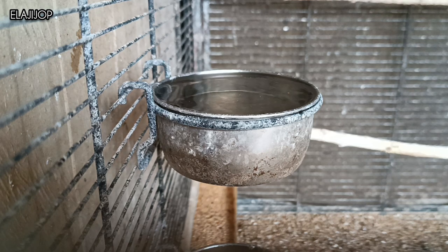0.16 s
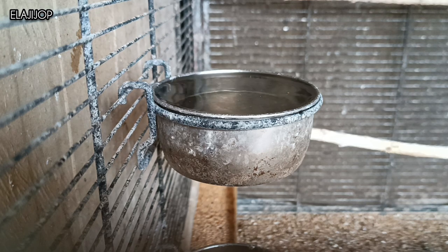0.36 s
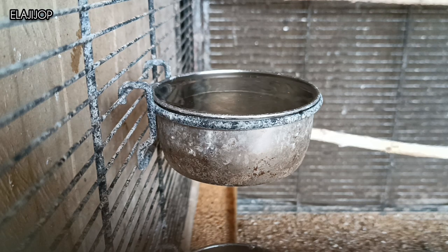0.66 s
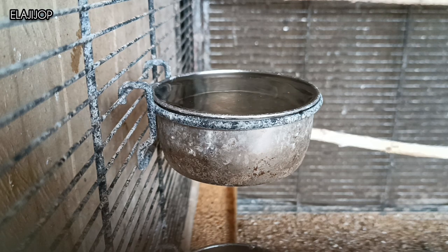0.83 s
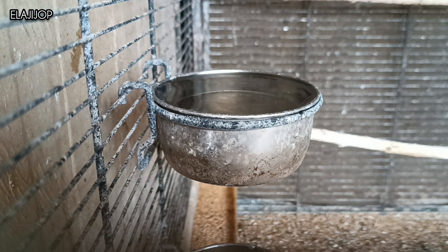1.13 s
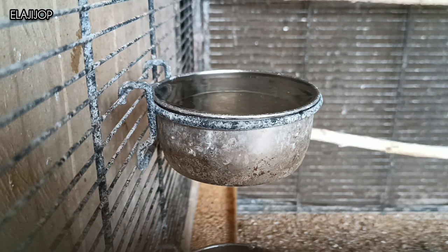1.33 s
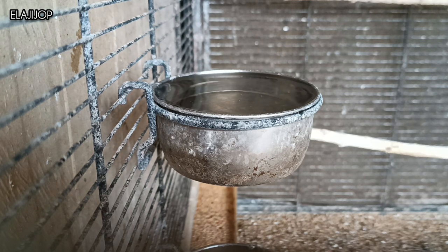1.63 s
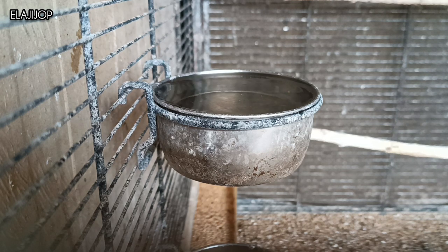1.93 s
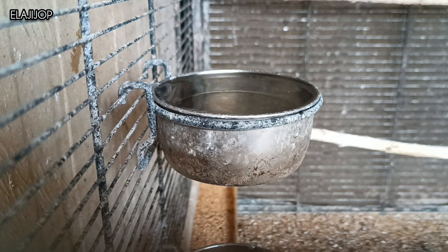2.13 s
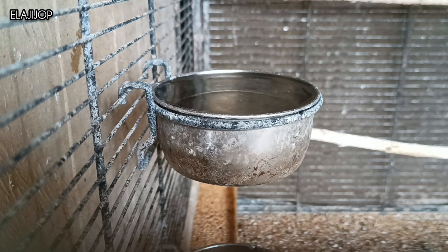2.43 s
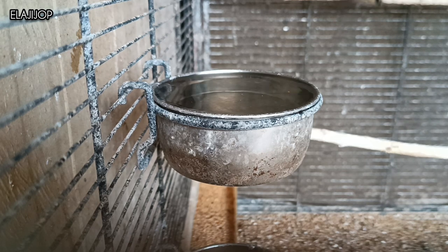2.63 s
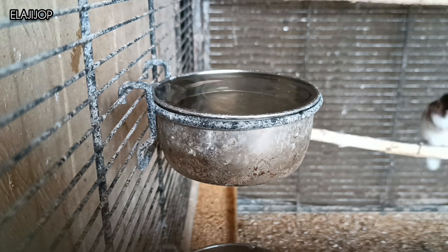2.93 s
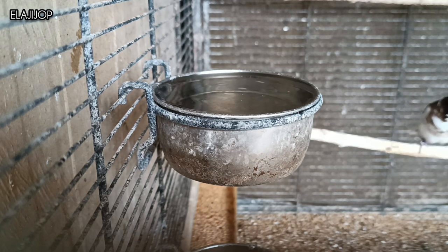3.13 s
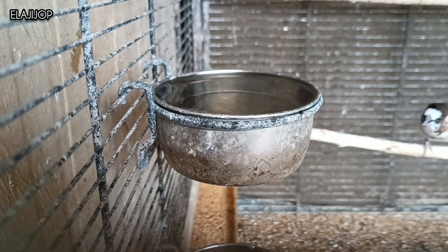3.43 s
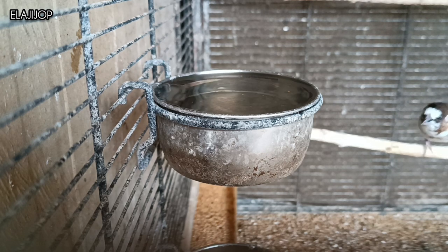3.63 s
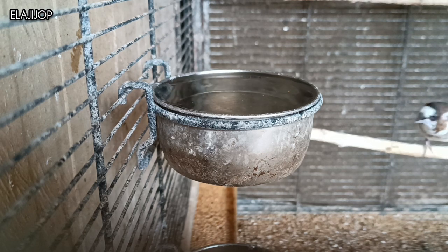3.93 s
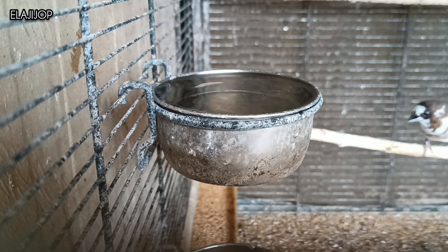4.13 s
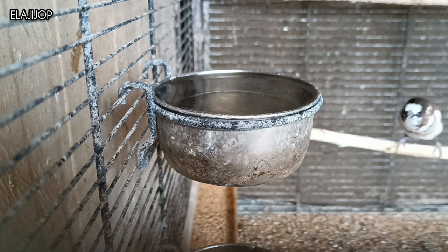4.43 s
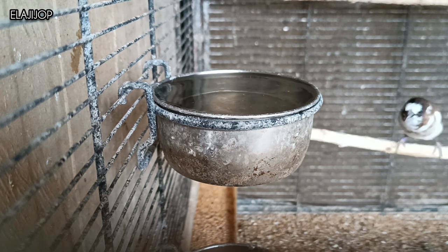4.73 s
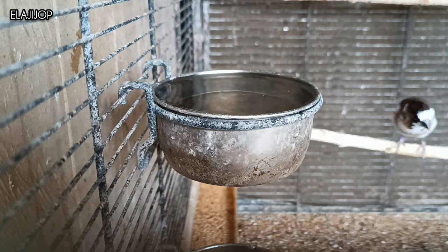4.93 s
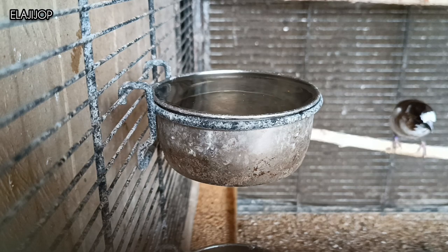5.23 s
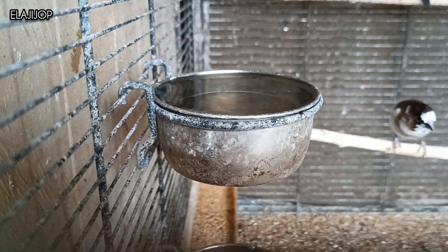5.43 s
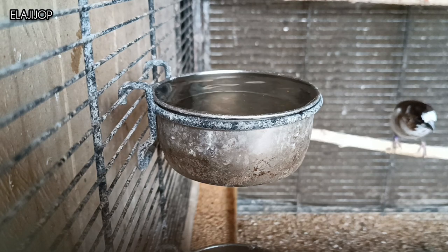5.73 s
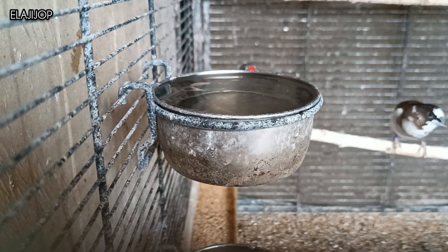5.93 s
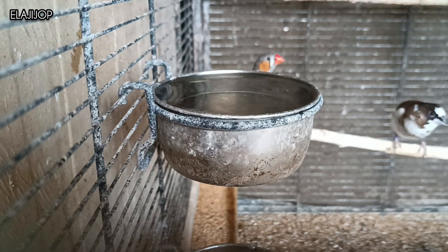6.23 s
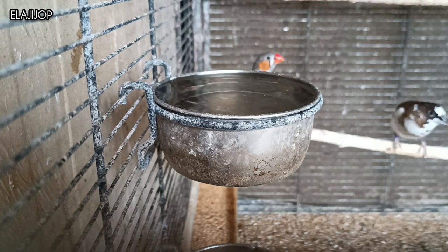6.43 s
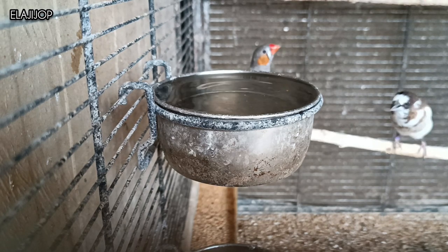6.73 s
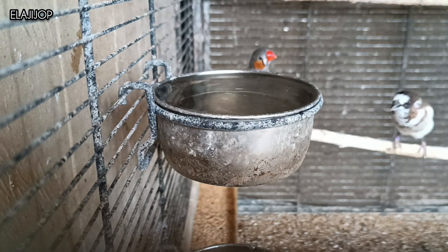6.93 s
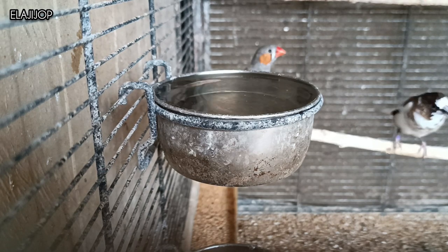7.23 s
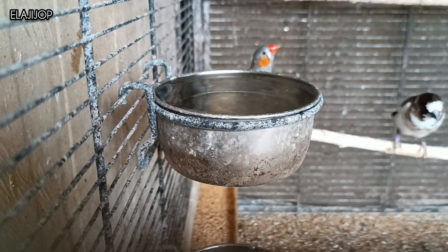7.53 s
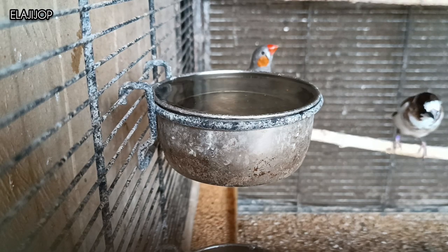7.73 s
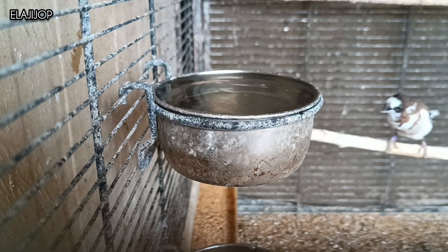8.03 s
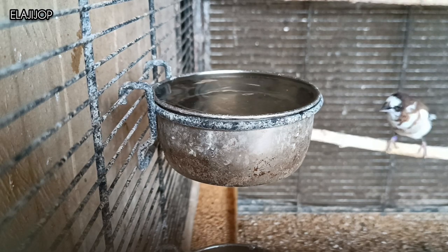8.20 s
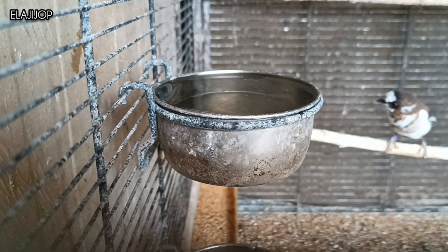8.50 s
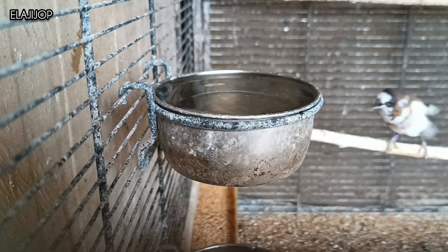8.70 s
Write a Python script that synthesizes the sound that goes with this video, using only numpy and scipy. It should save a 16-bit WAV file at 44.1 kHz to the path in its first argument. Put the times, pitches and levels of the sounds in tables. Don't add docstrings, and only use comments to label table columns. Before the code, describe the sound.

Caged finches chatter constantly in short nasal toots, hoarse scolds and tiny pips while wings whirr, feet tap perches and wire mesh rattles lightly.

```python
import sys
import numpy as np
from scipy import signal
from scipy.fft import rfft, irfft, next_fast_len
from scipy.io import wavfile
from scipy.ndimage import uniform_filter1d

SR = 44100
rng = np.random.default_rng(int(sys.argv[2]) if len(sys.argv) > 2 else 0)


def output_pcm(signal):
    pcm = np.clip(np.atleast_2d(signal).T, -1, 1) * 32767
    wavfile.write(sys.argv[1], SR, np.round(pcm).astype(np.int16))


def invert_db(x):
    u = np.asarray(x, float) / 20
    return 10 ** u


N = 390726

# f/Hz, level/dB
FEATHER_HISS = [(300, -5), (600, 11.5), (1500, 3.5), (3500, -7), (7500, -16.5), (12000, -6), (15800, -4.5)]


def evened(x):
    return x / np.sqrt(np.mean(x ** 2) + 1e-20)


def read(points, hz):
    f, value = np.transpose(points)
    return np.interp(np.log(hz + 1), np.log(f + 1), value)


def colour(x, points):
    size = next_fast_len(x.shape[-1])
    gain = invert_db(read(points, np.fft.rfftfreq(size, 1 / SR)))
    return irfft(rfft(x, size) * gain, size)[..., :x.shape[-1]]


def add(mix, s, sound, delay_ms=0., pan_db=0.):
    for side, sign in enumerate((1, -1)):
        start = max(round((s + sign * delay_ms / 2000) * SR), 0)
        part = mix[side, start:][:len(sound)]
        part += invert_db(sign * pan_db / 2) * sound[:len(part)]


def pair(points):
    # f/Hz, coherence (0-1, clipped)
    likeness = [(60, 0.85), (240, 0.97), (950, -0.019), (3770, -0.11), (15000, -0.02)]
    size = next_fast_len(N)
    a, b = rfft(rng.standard_normal((2, size)))
    hz = np.fft.rfftfreq(size, 1 / SR)
    same = np.clip(read(likeness, hz), 0, 1)
    ports = np.array([a, same * a + np.sqrt(1 - same ** 2) * b])
    return evened(irfft(ports * invert_db(read(points, hz)), size)[:, :N])


def air():
    # f/Hz, level/dB
    air_spectrum = [(15, -46), (25, -13.5), (91, 11.5), (255, 3), (392, 3.5), (749, -9), (1780, -11.5),
                    (2330, -4), (3300, -12), (4100, -16.5), (8270, -23), (12700, -17.5), (15800, -12)]
    swell_db = 1.1 * evened(uniform_filter1d(rng.standard_normal(N), 6000))
    return invert_db(-47 + swell_db) * pair(air_spectrum)


def room(x):
    # f/Hz, t60/s
    decay_times = [(200, 0.054), (1300, 0.19), (3500, 0.18), (9000, 0.025)]
    taps = np.zeros((2, 16000))
    at = np.arange(100, 15980, 20) + rng.integers(0, 20, (2, 794))
    np.put_along_axis(taps, at, rng.choice([-1., 1.], at.shape), 1)
    hz, t, z = signal.stft(taps, SR, nperseg=256)
    decay = invert_db(-60 * t / read(decay_times, hz)[:, None])
    tail = signal.istft(z * decay, SR, nperseg=256)[1]
    return signal.oaconvolve(x, tail / np.linalg.norm(tail[0]), axes=1)[:, :N]


def flights():
    # t/s, length/s, level/dB, feather hiss against that level/dB
    distant = [(0, 0.1, -41.5, -14.5), (0.177, 0.34, -62.5, 0), (1.066, 0.21, -51, -25),
               (1.58, 0.44, -46.5, -17), (2.415, 0.2, -39.5, -14.5), (2.852, 0.17, -35.5, -20.5),
               (3.398, 0.076, -39.5, -21), (3.678, 0.14, -39, -22), (4.062, 0.28, -32.5, -22.5),
               (4.831, 0.23, -37.5, -10), (4.98, 0.33, -43, -14), (5.257, 0.38, -39, -12),
               (5.896, 0.54, -48.5, -3), (6.423, 0.2, -34, -17), (6.498, 0.56, -33.5, -18.5),
               (6.907, 0.76, -44.5, -15.5), (7.616, 0.11, -48, -9.5), (7.882, 0.27, -35.5, -32)]
    # f/Hz, level/dB
    push_spectrum = [(25, -50), (38, -18), (60, -10), (86, 8.5), (120, -10), (155, 4.5), (200, -8),
                     (300, -46.5)]
    flap_spectrum = [(150, -39), (230, -5), (320, -3.5), (430, -13), (600, -44)]
    beats_per_s, flap_db = 27.7, -6
    t, levels = np.arange(N) / SR, np.zeros((3, N))
    for s, length, db, hiss_db in distant:
        span = levels[:, round(s * SR):][:, :round(length * SR)]
        layers_db = db + np.array([[0], [flap_db], [hiss_db]])
        span += invert_db(layers_db) * signal.windows.tukey(span.shape[1], .6)
    beat = np.cos(2 * np.pi * (beats_per_s * t + 0.57))
    push = levels[0] * pair(push_spectrum) * evened(1 + 0.034 * beat)
    flap = levels[1] * pair(flap_spectrum) * evened(np.exp(.9 * beat))
    hiss = levels[2] * invert_db(8) * pair(FEATHER_HISS) * evened(np.exp(.25 * beat))
    return push + flap + hiss


def rustles():
    # t/s, length/s, level/dB
    bursts = [(0.633, 0.039, -50), (0.918, .02, -48), (1.58, .02, -54), (1.84, .02, -55), (5.303, .03, -55),
              (5.775, .016, -50), (5.793, 0.032, -52), (6.138, .04, -44), (6.724, .03, -52),
              (7.046, 0.034, -49), (7.421, 0.13, -48.5), (7.594, 0.091, -48), (8.056, 0.024, -45)]
    # f/Hz, level/dB
    friction = [(1500, -14), (3000, 3), (6500, -7), (9000, 2), (11000, 4), (14000, 0), (15800, -7)]
    levels = np.zeros((2, N))
    for s, length, db in bursts:
        u = np.linspace(0, 1, round(length * SR))
        add(levels, s, invert_db(db) * np.minimum(u / 0.089, 1) * (1 - u) ** 0.55)
    crackle = invert_db(3.5 * evened(uniform_filter1d(rng.standard_normal(N), 90)))
    return levels * evened(crackle) * pair(friction)


def knocks():
    # t/s, peak level/dB, f/Hz
    blows = [(0.009, -31, 147), (0.551, -28, 214), (1.286, -30, 304), (2.235, -31.5, 310),
             (3.422, -28, 302), (4.08, -33.5, 303), (4.422, -32, 311), (5.093, -29.5, 210),
             (7.048, -34, 322), (7.165, -40, 162), (7.682, -37, 309), (8.143, -29, 220)]
    out, t = np.zeros((2, N)), np.arange(8000) / SR
    for s, db, hz in blows:
        envelope = invert_db(db - 60 * t / 0.12) * np.minimum(t / 0.0029, 1)
        add(out, s, envelope * np.sin(2 * np.pi * hz * t), 0, 1.5)
    return out


def landings():
    # t/s, peak level/dB, t60/s, mesh brightness/dB
    touches = [
        (0.385, -14.5, 0.046, -19.5),
        (0.407, -24, 0.018, -32),
        (0.706, -31.5, 0.048, 2.5),
        (2.756, -35, 0.24, -0.5),
        (4.483, -35, 0.064, -5),
        (6.945, -36.5, 0.2, -4.5),
        (7.471, -36.5, 0.14, 3),
        (7.913, -48.5, 0.34, 9.5),
        (8.379, -41, 0.27, 6),
    ]
    # f/Hz, level/dB
    modes = [(860, 7), (1100, 8), (1390, 8.5), (1600, 12.5), (1900, 6), (2200, 8.5), (2500, -29)]
    mesh = [(300, -48), (800, -11.0), (2000, 7.5), (7000, -5.0), (15500, -15.0)]  # f/Hz, level/dB
    out, t = np.zeros((2, N)), np.arange(8000) / SR
    for s, db, t60, bright_db in touches:
        ring = np.zeros(len(t))
        for hz, mode_db in modes:
            detuned_hz = hz * rng.uniform(.93, 1.07)
            ring += invert_db(mode_db - 90 * t / t60) * np.sin(2 * np.pi * detuned_hz * t)
        rattle = evened(colour(rng.standard_normal(len(t)), mesh))
        rattle *= invert_db(bright_db - 60 * t / t60)
        add(out, s, invert_db(db) * (ring / abs(ring).max() + rattle))
    return out


def strokes():
    # t/s, peak level/dB
    beats = [(2.454, -38), (2.495, -35), (2.533, -40), (2.58, -49), (5.375, -35), (5.412, -22),
             (5.458, -29), (5.498, -41), (5.58, -26.5), (7.91, -26), (7.95, -14.5), (7.987, -20.5),
             (8.031, -22), (8.07, -24.5)]
    out, t = np.zeros((2, N)), np.arange(8000) / SR
    u = t / 0.0035
    push = np.sin(2 * np.pi * u) * np.exp(-(u - .8) ** 2 / 0.13)
    for s, db in beats:
        swish = evened(colour(rng.standard_normal(len(t)), FEATHER_HISS))
        add(out, s, invert_db(db) * (push + .12 * invert_db(-60 * t / .15) * swish), 0, 1.5)
    return out


def pip(db, hz, first, length):
    # multiple of f, level/dB
    partials = [(.5, -24), (1, 0), (1.5, -17), (2, -28)]
    u = np.linspace(0, 1, round(length * SR))
    rasp, breath = rng.standard_normal((2, 2000))
    turns = np.cumsum(hz * (first + (1 - first) * u)) / SR
    tone = sum(invert_db(d) * np.sin(2 * np.pi * k * turns) for k, d in partials)
    tone *= 1 + .35 * evened(uniform_filter1d(rasp, 30))[:len(u)]
    breath = colour(breath, [(hz / 2, -30), (hz, 0), (hz * 1.5, -10), (hz * 2.2, -35)])
    tone += 0.3 * evened(breath)[:len(u)]
    return invert_db(db - 3.5) * np.sin(np.pi * u) * tone


def pips():
    # t/s, peak level/dB, end f/Hz, start as share of the end, length/s
    flicks = [(0.1546, -13.5, 4200, 1.04, 0.016), (0.325, -38, 3650, 0.93, 0.014),
              (0.379, -22, 4010, 0.85, .011), (0.937, -22, 3855, 0.81, .014),
              (0.9805, -23.5, 3870, 1, 0.021), (1.601, -19, 4010, 0.93, .012),
              (1.568, -35, 3420, 1.4, .012), (2.344, -15, 4900, 1.07, 0.01),
              (2.357, -10, 4280, 1.08, 0.0091), (2.445, -17.5, 4390, 1.18, 0.023),
              (2.808, -21, 3370, .95, 0.0086), (3.7135, -17.5, 4978, 1.1, 0.0078),
              (3.73, -18, 4200, 0.98, 0.0079), (4.0214, -19, 4500, 1.14, .016),
              (4.112, -19.5, 2840, 0.98, .011), (4.181, -20.5, 4400, 1.12, 0.0144),
              (7.643, -37, 3726, 0.87, .011), (7.859, -25.5, 4040, 0.65, .016),
              (7.91, -27, 3840, 0.98, .012)]
    out = np.zeros((2, N))
    for s, *flick in flicks:
        add(out, s - .003, pip(*flick), .1)
    return out


def far_calls():
    # t/s, length/s, level/dB, f/Hz
    carried = [
        (0.277, 0.039, -41, 1590),
        (1.048, 0.039, -50, 2310),
        (4.759, 0.062, -43.5, 2260),
        (5.275, 0.091, -45, 2285),
    ]
    out = np.zeros((2, N))
    for s, length, db, hz in carried:
        t = np.arange(0, length, 1 / SR)
        add(out, s, invert_db(db) * np.sin(np.pi * t / length) * np.sin(2 * np.pi * hz * t), .3)
    return out


def voice(hz, level_db, rough, beak_hz):
    # f/Hz, level/dB
    throat_shape = [(300, -44), (550, -10.5), (750, -13), (1100, -4.5), (1660, -8), (2000, -3), (3000, 2),
                    (3600, 2), (4800, -0.5), (5800, -10.5), (7500, -21.5)]
    # f/Hz, level/dB
    thin_top = [(9000, -23.5), (12000, -16.5), (16000, -24)]
    usual_hz = 3400
    focus_db, focus_width_hz = 5, 400
    rough = np.clip(rough, 0, 1)
    jitter, breath = rng.standard_normal((2, SR // 3))[:, :len(hz)]
    hz = hz * (1 + (.025 + .24 * rough) * uniform_filter1d(jitter, 160))
    turns, k = np.cumsum(hz) / SR, np.arange(1, 27)[:, None]
    throat = [(f * beak_hz / usual_hz, db) for f, db in throat_shape[:-1]] + throat_shape[-1:] + thin_top

    slow = k * hz[::64]
    soft_db = .85 * (level_db - np.max(level_db)) * np.ones(len(hz))
    shut_db = np.minimum(beak_hz - usual_hz, 0) / 70
    top_db = (soft_db[::64] + shut_db) * np.log2(np.maximum(slow / 2800, 1))
    top_db += np.maximum(beak_hz - 3000, 0) / 110 * np.log2(np.minimum(slow / 2400, 1))
    top_db += focus_db * np.exp(-((slow - beak_hz) / focus_width_hz) ** 2)
    shimmer = uniform_filter1d(rng.standard_normal((len(k), 240)), 7, axis=1)[:, :slow.shape[1]]
    shimmer_db = (3 + 16 * np.min(rough)) * shimmer
    uneven_db = np.interp(slow, np.arange(40) * 450, 2.5 * rng.standard_normal(40))
    gains = invert_db(read(throat, slow) + top_db + shimmer_db + uneven_db) * (slow < 16000)
    gains = uniform_filter1d(np.repeat(gains, 64, axis=1), 64, axis=1)[:, :len(hz)]
    buzz = (gains * np.cos(2 * np.pi * k * turns + .2 * k ** 2)).sum(0)

    puffs = (3.9 + np.exp(-(turns % 1) / 0.51)) * breath
    breath_shape = [(f, db + shut_db * np.log2(max(f / 2800, 1))) for f, db in throat[2:]]
    puffs = colour(puffs, [(500, -16)] + breath_shape)
    airy = .85 * rough
    return invert_db(level_db) * (np.sqrt(1 - airy) * evened(buzz) + np.sqrt(airy) * evened(puffs))


def short_call(length, db, pitch_hz, beak_hz, first, last, rough):
    u = np.linspace(0, 1, round(length * SR))
    hz = pitch_hz * (first * (2 * u - 1) * (u - 1) + 4 * u * (1 - u) + last * u * (2 * u - 1))
    hz *= 1 - .07 * np.exp(-u * length / .007) - .09 * u ** 6
    swell = np.minimum(u / .42, 1) ** .55 * np.minimum((1 - u) / .28, 1)
    return swell * voice(hz, db, rough + .8 * u ** 7, beak_hz)


def long_call(length, db, hold, fall, effort, rough):
    rise_s, fade_s = 0.011, 0.035
    (top_hz, low_hz, sudden), (first_db, last_db, beak_hz) = fall, effort
    t = np.arange(0, length, 1 / SR)
    left = 1 - np.clip((t - hold) / (length - hold), 0, 1)
    glide = uniform_filter1d(low_hz * (top_hz / low_hz) ** (left ** sudden), 500, mode="nearest")
    below_db = first_db * np.maximum(1 - t / hold, 0)
    glide *= 1 + .006 * below_db
    level_db = db + below_db + last_db * (1 - left)
    ends = np.minimum(t / rise_s, 1) * np.minimum((length - t) / fade_s, 1)
    return ends * voice(glide, level_db, rough * (1 - .3 * left ** 4), beak_hz)


def add_short_calls(corners):
    # t/s, length/s, level/dB, pitch f/Hz, beak resonance f/Hz
    clear = [(0.769, 0.056, -27, 494.4, 3170), (1.497, 0.057, -26.5, 498, 3240),
             (3.099, 0.092, -29.5, 577, 2620), (3.433, 0.044, -30.5, 526.3, 3270),
             (4.675, 0.048, -27, 493.3, 3250), (4.85, 0.067, -33, 663, 2920),
             (5.016, 0.044, -28.5, 496, 3050), (5.583, 0.086, -32, 670.4, 2910),
             (8.109, 0.089, -33, 564, 2700), (8.198, 0.044, -26, 511.6, 3130)]
    flat = [(0.16, 0.082, -35, 514, 2980), (1.254, 0.053, -31.5, 575.5, 3940),
            (1.683, .11, -30, 584.2, 2780), (1.852, 0.049, -28, 491.6, 3400),
            (2.158, .065, -37.5, 610, 1940), (2.345, 0.08, -26, 592, 3130), (2.752, 0.03, -27, 862, 2500),
            (5.169, 0.044, -29, 503.7, 3180), (5.88, 0.092, -27.5, 582, 2750),
            (6.173, 0.043, -35.5, 553.5, 2040), (7.103, 0.062, -26, 568, 3440),
            (7.453, 0.046, -35.5, 450, 3300), (7.694, 0.068, -26.5, 491.4, 3470),
            (8.161, 0.056, -24.5, 548, 3700), (8.561, 0.094, -36, 618, 2930)]
    rising = [(0.527, 0.029, -28.5, 561, 3260), (1.358, 0.066, -35, 568, 4300),
              (1.615, 0.049, -27, 622, 3600), (2.052, 0.084, -26, 607, 3330),
              (2.444, 0.058, -27, 564, 2920), (2.637, 0.05, -29, 499, 3620), (3.946, 0.086, -34, 640, 2750),
              (5.119, 0.073, -25, 615, 3370), (8.475, 0.064, -26, 576.5, 3320),
              (8.826, 0.073, -25.5, 589, 3100)]
    falling = [(2.583, 0.071, -35.5, 520, 3500), (2.89, 0.056, -34.5, 531, 3520),
               (2.995, 0.085, -26.5, 579, 3640), (3.763, 0.084, -24, 599, 3740),
               (4.48, 0.063, -28, 696, 2910), (4.976, 0.0526, -32, 553, 4030),
               (6.932, 0.051, -40, 614, 2840)]
    hoarse = [(3.704, 0.063, -23.5, 650, 3280), (3.786, 0.1, -30, 840, 3500),
              (4.107, 0.071, -36.5, 570, 3200), (4.179, 0.049, -29, 843, 3150),
              (4.306, 0.071, -30, 662.6, 2860), (6.02, 0.12, -26, 550, 3500),
              (.695, 0.0725, -29.5, 550, 3170), (.464, 0.07, -28.5, 490, 3480),
              (5.365, 0.089, -29, 818, 3500), (6.522, 0.11, -25, 890, 3720), (7.897, 0.073, -31, 535, 3440),
              (8.646, 0.056, -26.5, 590, 3440), (4.011, 0.08, -29, 576.4, 2840),
              (8.37, 0.076, -27.5, 597.6, 3350)]
    kinds = [
        (1.04, 1.0, .04),
        (1, 1.03, .19),
        (.9, .98, .2),
        (1.09, 1, .22),
        (1, 1, .47),
    ]
    # t/s, left delay/ms, left-right level/dB
    places = [(0.156, -0.0036, 5), (0.464, -0.45, 1), (0.526, 0.11, 1.6), (0.691, 0.56, 4.5),
              (0.772, 0.23, 0), (1.115, -0.63, 2.7), (1.257, 0.4, 2), (1.358, -0.14, -1), (1.497, 0.19, 4),
              (1.612, -0.56, 0), (1.682, 0.28, 1), (1.849, -0.44, 1.5), (2.049, 0.41, 1.5),
              (2.258, 0.29, -2), (2.355, 0.41, -1.5), (2.438, -0.47, -2.5), (2.582, 0.064, 3.5),
              (2.635, 0.057, 3), (2.764, 0.45, 0), (2.89, -0.14, 1), (2.996, 0.51, 3), (3.106, 0.53, 8),
              (3.433, 0.14, 5), (3.616, 0.021, 2.5), (3.703, -0.43, -1), (3.768, 0.51, 0.3),
              (3.944, 0.044, -2.7), (4.01, 0.07, 2), (4.11, 0.42, 0), (4.181, 0.4, -2), (4.311, -0.54, 5),
              (4.478, 0.56, 0.4), (4.673, 0.16, 2), (4.848, 0.46, -2), (4.974, 0.39, 1.5),
              (5.014, 0.47, 1.5), (5.115, 0.54, 3.5), (5.17, 0.14, -2.5), (5.365, 0.63, 3),
              (5.585, 0.16, -5.5), (5.876, 0.21, 4.5), (6.012, 0.5, 0.5), (6.171, -0.39, 4),
              (6.525, -0.22, -0.5), (6.931, -0.28, 4), (7.103, -0.47, 1.5), (7.45, 0.18, 1),
              (7.693, 0.43, 1.8), (7.894, 0.56, 4), (8.109, 0.45, 3.5), (8.159, -0.42, 1.5),
              (8.202, 0.44, -0.5), (8.37, -0.65, 2.2), (8.472, 0.19, -0.5), (8.564, 0.54, 2),
              (8.645, -0.35, 2.5), (8.826, 0.18, 0)]
    for calls, kind in zip((clear, flat, rising, falling, hoarse), kinds):
        for i, (s, *call) in enumerate(calls):
            corner = corners[0 if calls is clear else 1 + i % 2]
            _, delay_ms, pan_db = min(places, key=lambda place: abs(place[0] - s))
            add(corner, s, short_call(*call, *kind), delay_ms, pan_db)


def add_long_calls(corners):
    # t/s, length/s, level/dB, pitch held/s, left delay/ms
    birds = [
        [(0.06, 0.16, -24, 0.032, -.19), (2.153, 0.21, -20.5, 0.023, .09), (2.975, 0.16, -23, 0.025, .48)],
        [(3.11, 0.18, -26, 0.015, -.4), (6.228, 0.16, -24.5, 0.022, -.39)],
        [(3.73, 0.1, -22.5, 0.049, .45), (5.965, 0.15, -21, 0.077, .39), (6.455, 0.26, -21, 0.094, .15)],
        [(5.342, 0.15, -25, 0.037, .05)],
        [(0.069, 0.141, -29.5, 0.027, .23)],
        [(1.115, 0.17, -26, 0.04, -.34)],
        [(2.256, 0.082, -24, 0.043, .11), (3.616, 0.12, -22, 0.028, .11), (4.318, 0.12, -25.5, 0.025, -.45)],
        [(6.202, 0.11, -32, 0.024, .2)],
    ]
    # held f/Hz, last f/Hz, suddenness of the fall
    falls = [(1246, 600, 2.5), (1148, 390, 1.8), (1264, 350, 1.6), (1430, 540, 1.6), (869, 570, 2.4),
             (683, 440, 3.1), (672, 510, 1.2), (638, 1700, 1.126)]
    # start below peak/dB, end below peak/dB, beak resonance f/Hz
    efforts = [(-6.5, -10, 3600), (-7.5, -8.5, 4180), (-18.5, -37, 2480), (-15, -14, 3600), (2, 3, 3150),
               (5, -6, 3360), (-2, -7.5, 3310), (-4.5, -2, 1830)]
    roughness = [.14, .09, .26, .18, .15, .11, .1, .1]
    for i, (calls, *bird) in enumerate(zip(birds, falls, efforts, roughness)):
        for s, length, db, hold, delay_ms in calls:
            add(corners[1 + i % 2], s, long_call(length, db, hold, *bird), delay_ms)


def flock():
    corners = np.zeros((3, 2, N))
    corners[0] += far_calls() + pips()
    add_short_calls(corners)
    add_long_calls(corners)
    return corners


def scene():
    corner_room_db = [-8, -5, -4]
    near = knocks() + landings() + strokes()
    echo = invert_db(-6.0) * colour(room(near), [(350, -10), (700, 6.5)])
    birds = sum(corner + invert_db(db) * room(corner) for corner, db in zip(flock(), corner_room_db))
    return air() + flights() + rustles() + near + echo + birds


def band_limit(x):
    return signal.sosfilt(signal.butter(12, 15880, fs=SR, output="sos"), x)


def record(dry):
    # f/Hz, left-right level/dB
    lean = [(60, 0), (180, 2), (550, 3.5), (1650, -1), (4970, -4), (15000, 8.5)]
    # f/Hz, level/dB
    port_colour = [(60, 0), (7000, 4.5), (8500, -2.5), (10500, -2), (12500, -1), (15500, -7.5)]
    left = colour(dry[0], [(f, db / 2) for f, db in lean])
    right = colour(dry[1], [(f, -db / 2) for f, db in lean])
    ported = colour(np.array([left, right]), port_colour + [(15800, -6), (15950, -60)])
    return band_limit(ported)


dry = scene()
out = record(dry)
output_pcm(out)
```